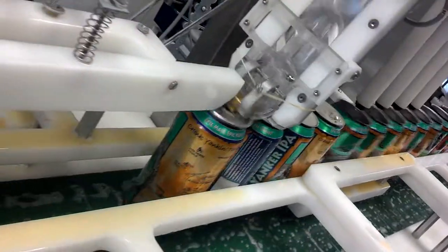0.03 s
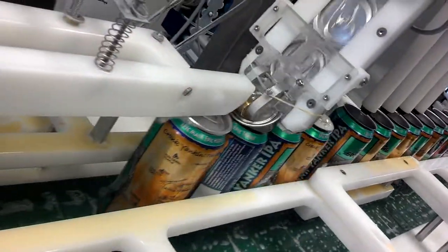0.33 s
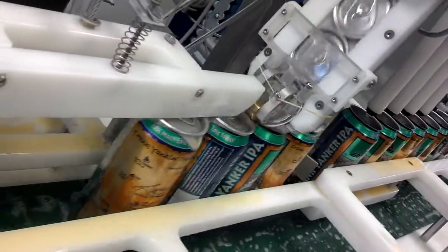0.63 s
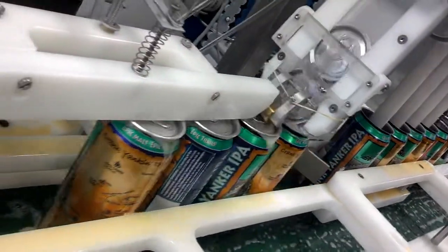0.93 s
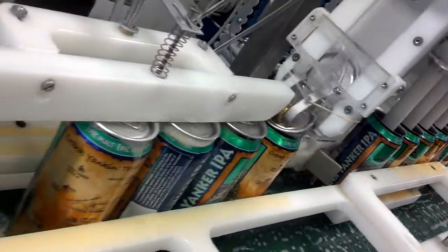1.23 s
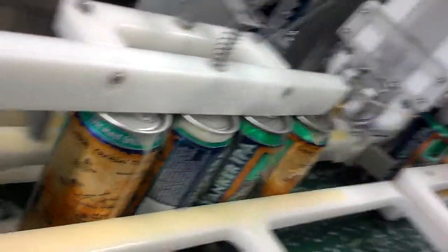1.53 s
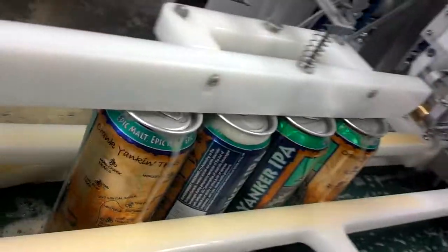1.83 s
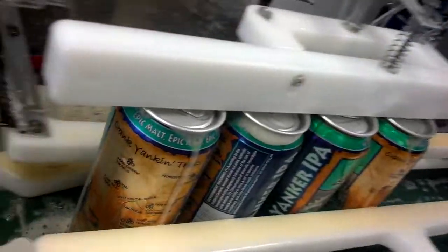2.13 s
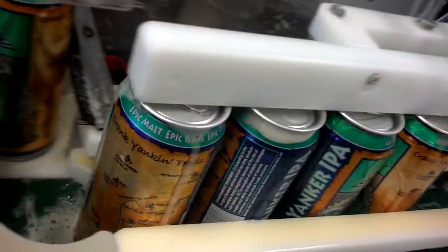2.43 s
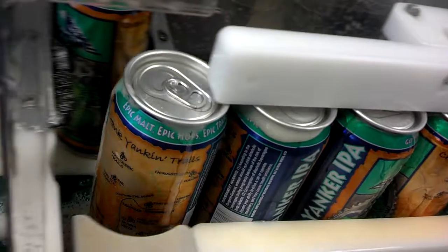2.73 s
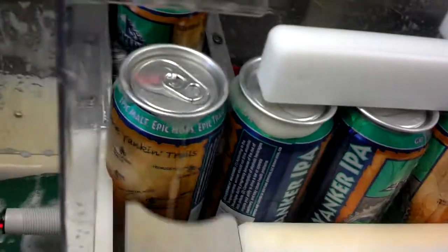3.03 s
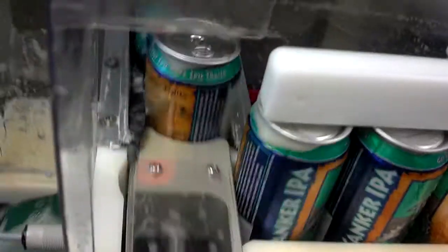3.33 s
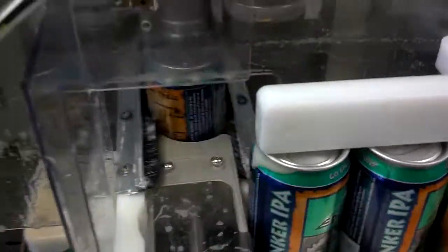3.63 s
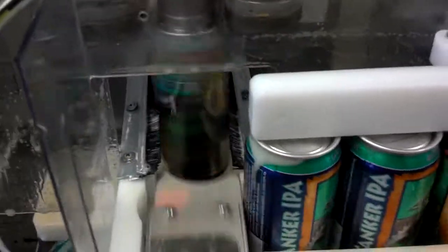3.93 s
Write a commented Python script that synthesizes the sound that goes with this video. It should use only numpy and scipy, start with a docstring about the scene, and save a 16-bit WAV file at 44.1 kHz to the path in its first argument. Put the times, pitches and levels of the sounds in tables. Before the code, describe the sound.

Metal cans knock together on a canning line as gas hisses over rumbling machinery.

```python
"""Aluminium cans jostle and clink on a canning line close by, their thin walls crackling at each touch.
Hard stops clack and plastic guides knock. A pusher scrapes to a halt and leaves a rail ringing.
A gas jet swells and shuts off, over the rumble of the machines.
Two microphone openings (ports), close together, are widened to stereo by delay and subtraction."""
import sys
import numpy as np
from scipy import signal
from scipy.fft import rfft, irfft, next_fast_len
from scipy.io import wavfile
from scipy.ndimage import map_coordinates

SR = 44100
rng = np.random.default_rng(int(sys.argv[2]) if len(sys.argv) > 2 else 0)


def store_pcm(level_fs):
    """Save levels as 16-bit WAV."""
    pcm = np.round(np.clip(level_fs, -1, 1) * 32767).astype(np.int16)
    wavfile.write(sys.argv[1], SR, np.atleast_2d(pcm).T)


N = 176400
T = np.arange(N) / SR
HIT_T = T[:SR // 4]  # time within one hit
CLINK_RISE_S = 0.0022
NEAR_ONLY = [[1], [0]]  # sounds have two rows: near port, far port

# Levels are relative. A "colour" is the level at each pitch; a "decay" is the time to fade by 60 dB.
# main colour of a can wall (frequency [Hz], level [dB])
CAN_WALL = [(300, -53), (1200, -17.5), (2300, -3.5), (3400, 1.5), (4400, -1.5), (5050, -6), (5550, 3.5),
            (6200, -9.5), (7500, -22)]
# its bright top (frequency [Hz], level [dB])
CAN_SIZZLE = [(4500, -25), (6500, -3.5), (9000, 2.5), (11000, 1), (13000, -5), (15500, -1.5)]


def cans(boost_db=5, ring_db=-5, detune=0.025):
    """Each touch gives a short crackle and a faint ring; no two cans are tuned quite alike."""
    # cans touching (time [s], level before the boost [dB], treble [dB], decay [s])
    clinks = [(.014, -27, -11, 0.03), (.039, -29, -17, 0.026), (0.057, -38, -14, 0.035),
              (.093, -17, -7, 0.031), (0.154, -20.5, -11, 0.069), (0.161, -29.5, 6.5, 0.041),
              (.197, -28, -5, 0.051), (0.257, -17.5, -26, 0.052), (.281, -31.5, 2.5, 0.071),
              (.33, -35.5, 2, 0.09), (0.35, -40, 14, 0.022), (0.399, -30, 1.5, 0.078),
              (0.412, -26, 4, 0.075), (0.452, -35.5, 11, 0.054), (.466, -35, 1, 0.063),
              (0.488, -43, 2, 0.043), (0.527, -21.5, -3.5, 0.035), (0.571, -26, -8, 0.044),
              (.577, -15, -5, 0.043), (.639, -29, -5.5, 0.09), (.714, -38, -9, .03),
              (0.724, -38, -4, 0.027), (0.776, -43, -3, 0.29), (0.873, -33, -11, 0.12),
              (0.924, -28.5, -16, 0.032), (.952, -25, -1, 0.03), (1.012, -33, -7, 0.061),
              (1.028, -23, -8, 0.096), (1.043, -27.5, -1.5, 0.11), (1.08, -37, -15, 0.071),
              (1.138, -37, 2, 0.038), (1.152, -36, 5, 0.029), (1.206, -40, 6, .04),
              (1.229, -31.5, -5, 0.074), (1.242, -28, -5, 0.053), (1.274, -42, 4, .08),
              (1.574, -25, -6.5, 0.036), (1.584, -21, -7, 0.029), (1.632, -27.5, 0, 0.089),
              (1.661, -20, -16, 0.033), (1.675, -18, -19, 0.058), (1.699, -27, -3.5, 0.051),
              (1.712, -21, -6, 0.033), (1.735, -29, 2, 0.028), (1.805, -21.5, -5, 0.063),
              (1.82, -32.5, 9.5, 0.089), (1.846, -24.5, 3, 0.029), (2.437, -26.5, -13, 0.078),
              (2.973, -19, -8, 0.06), (2.985, -23.5, 5.5, 0.018), (3.036, -30.5, -8, 0.053),
              (3.058, -27, -5, 0.13), (3.077, -22, -14, 0.04), (3.089, -22, -9, 0.056),
              (3.096, -29, -8, 0.12), (3.127, -41, 3, .03), (3.17, -37.5, -1, 0.1), (3.197, -37, 3, 0.069),
              (3.21, -34, -0.5, 0.13), (3.258, -33, 2, 0.052), (3.274, -29, 7, 0.034),
              (3.288, -30, 6, 0.065), (3.305, -35, 4.5, 0.1), (3.333, -31, 9, 0.03), (3.345, -45, 0, .03),
              (3.361, -40, 2, 0.082), (3.546, -24.5, -10, 0.029), (3.569, -35.5, -10, 0.047),
              (3.73, -42.5, -10, 0.05), (3.757, -53, 10.5, 0.044), (3.85, -23.5, -14.5, 0.068)]
    # notes a can rings at (frequency [Hz], level [dB], decay [s])
    can_notes = [(2420, -5, 0.034), (3505, -14, 0.062), (3866, -22, 0.034), (5500, -16, 0.12),
                 (9040, -17.5, 0.12), (11500, -13, 0.07)]
    out = np.zeros((2, N))
    for start, db, treble_db, decay in clinks:
        ring = 0
        for hz, note_db, note_decay in can_notes:
            note = tone(hz * (1 + detune * rng.normal()), HIT_T)
            ring += amp(note_db) * note * fade(note_decay, CLINK_RISE_S)
        wall = crackle(treble_db) * fade(decay, CLINK_RISE_S)
        add(out, start, amp(db + boost_db) * (wall + amp(ring_db) * ring))
    return out


def crackle(treble_db):
    """A thin can wall chatters at many pitches at once."""
    body = noise(CAN_WALL, len(HIT_T), uneven_db=7)
    sizzle = noise(CAN_SIZZLE, len(HIT_T), uneven_db=7)
    chatter = unit(amp(1.5 * wobble(517, HIT_T)))
    return (body + amp(treble_db) * sizzle) * chatter


def rims():
    """Can rims snap against each other with dry clicks."""
    # clicks (time [s], level [dB])
    snaps = [(.0935, -19), (0.167, -8), (.4108, -11.5), (0.454, -17), (0.5762, -12.5), (0.642, -25),
             (.953, -27), (1.138, -23), (1.152, -19.5), (1.8065, -16), (2.975, -14.5), (2.985, -8.5),
             (3.0583, -15), (3.077, -11.5), (3.2745, -10), (3.2879, -8.5), (3.3329, -15), (3.4734, -10),
             (3.547, -19), (3.851, -12.5)]
    # colour of a click (frequency [Hz], level [dB])
    colour = [(600, -18), (2000, -16), (3600, 10), (6000, 6.5), (10000, -15), (15500, 5.5)]
    out = np.zeros((2, N))
    for start, db in snaps:
        click = noise(colour, len(HIT_T), uneven_db=8) * fade(decay_s=0.011, rise_s=0.00015)
        add(out, start, amp(db) * click)
    return out


def jostle(touches_per_s=100, spread_db=4.5, treble_db=-6, decay_s=0.089):
    """Many cans touch faintly, at random, further along the queue."""
    # loudness of the queue (time [s], level [dB])
    loudness = [(0, -33.5), (.35, -36.5), (.7, -44), (1.05, -43), (1.75, -34), (2.2, -61), (2.9, -48),
                (3.3, -41), (3.65, -60), (4, -46)]
    touches = (rng.random(N) < touches_per_s / SR) * amp(spread_db * rng.standard_normal(N))
    fading_touches = unit(signal.fftconvolve(touches, fade(decay_s, CLINK_RISE_S))[:N])
    walls = noise(CAN_WALL) + amp(treble_db) * noise(CAN_SIZZLE)
    return amp(curves(loudness)[0]) * fading_touches * walls


def hard_stops():
    """A hard stop pings straight at the near port, and the sound scatters through the machine."""
    # clacks (time [s], level [dB], ping pitch [Hz], scatter compared with ping [dB])
    clacks = [(0.244, -12.5, 3350, -8.5), (1.5745, -3.5, 3330, -15), (2.06, 3, 3370, -14.5),
              (2.152, -5, 3260, -15), (3.4735, -4.5, 2790, -10.5), (3.524, -18, 3300, -7.5)]
    pings, scatter = np.zeros((2, 2, N))
    for start, db, hz, scatter_db in clacks:
        ping = np.sqrt(2) * np.sin(2 * np.pi * hz * HIT_T) * fade(decay_s=0.0049, rise_s=0.0003)
        add(pings, start, amp(db) * ping * NEAR_ONLY)
        clatter = crackle(treble_db=-5) * fade(decay_s=0.047, rise_s=0.00033)
        add(scatter, start, amp(db + scatter_db) * clatter)
    return pings, scatter


def guides():
    """A knock on a plastic guide gives a dull thud and rattles the frame."""
    # knocks (time [s], level [dB], pitch [Hz], rattle [dB], decay [s])
    knocks = [(.076, -24.5, 415, 6, 0.069), (.088, -21, 964, 4, 0.045), (.107, -22, 1537, 10, 0.037),
              (0.159, -14.5, 1290, -21, 0.03), (0.257, -23.5, 1210, -3, 0.05), (.575, -28, 346, 2, 0.08),
              (1.027, -24, 342.6, 0, 0.17), (1.186, -30, 276, -19, 0.081), (1.229, -33, 169, -5, 0.21),
              (1.268, -17.5, 440, 3.5, 0.028), (1.274, -17.5, 396, -7, 0.076),
              (1.2765, -18, 1440, 13, 0.016), (1.307, -21.5, 388, -10, 0.085), (1.346, -30, 391, 0, 0.16),
              (1.572, -18, 1098, -3.5, 0.06), (1.662, -35.5, 790, 14.5, 0.084),
              (1.678, -16.5, 374, -2, 0.069), (2.021, -25, 910, -15, 0.075), (2.06, -18, 1677, -1.5, 0.04),
              (2.363, -33.5, 273, -4.5, 0.33), (2.439, -35.5, 1290, 5, 0.17),
              (2.973, -21.5, 1088, -1, 0.071), (3.06, -26.5, 1990, -2, 0.11),
              (3.08, -38, 1200, 13.5, 0.083), (3.851, -38.5, 431, 12.5, 0.14)]
    # notes within a thud (multiple of the pitch, level [dB])
    thud_notes = [(.8, -9.5), (1, 1.5), (1.45, -4.5)]
    out = np.zeros((2, N))
    for start, db, hz, rattle_db, decay in knocks:
        blur_radians = 1.53 * min(1, amp(rattle_db))  # more rattle, less clear pitch
        thud = 0
        for ratio, note_db in thud_notes:
            phase = 2 * np.pi * ratio * hz * HIT_T + blur_radians * wobble(142, HIT_T)
            thud += amp(note_db) * np.sin(phase)
        knock = thud * NEAR_ONLY + amp(rattle_db) * frame_rattle()
        add(out, start, amp(db) * knock * fade(decay, rise_s=0.0017))
    return out


def frame_rattle():
    """The shaken frame makes noise with no clear pitch."""
    # colour of the frame (frequency [Hz], level [dB])
    colour = [(70, -48), (130, -25), (300, -8.5), (700, -0.5), (1300, 1), (2000, 3), (3200, -0.5),
              (6000, -82)]
    return noise(colour, len(HIT_T), uneven_db=1.5)


def pusher(ring_start_s=0.1, ring_decay_s=1.33):
    """A juddering scrape ends by setting a steel rail ringing."""
    # loudness of the scrape (time [s], level [dB])
    loudness = [(0, -26.5), (.02, -26.5), (.05, -26.5), (.07, -22.5), (.09, -21), (.11, -35), (.16, -30.5),
                (.19, -64), (.3, -55), (.5, -92)]
    # colour of the scrape (frequency [Hz], level [dB])
    colour = [(100, -15), (300, -14), (420, -7), (520, 4.5), (700, -1), (860, -5), (960, 11.5), (1100, -2),
              (1400, -8), (1850, -9.5), (2500, -8), (5000, -23)]
    # notes of the rail (frequency [Hz], level [dB])
    rail_notes = [(565, -36.5), (640, -49), (745, -40), (950, -42), (1152, -34), (1680, -40.5), (1823, -39),
                  (2120, -44), (3692, -63)]
    out = amp(curves(loudness)[0] + 2.2 * wobble(69)) * noise(colour)
    for hz, db in rail_notes:
        ring = amp(db + 4 * wobble(27)) * wavering_tone(hz, radians=0.76, rate=35)
        add(out, ring_start_s, ring * fade(ring_decay_s, rise_s=0.006, t=T))
    return out


def gas_jet():
    """Gas hisses out, sags and shuts off; it turns hollow as the listener moves along the guides."""
    # loudness of the hiss (time [s], level [dB])
    loudness = [(0, -64), (1.18, -54), (1.24, -45), (1.29, -29.5), (1.45, -25.5), (1.56, -25),
                (1.62, -30.5), (1.8, -28.5), (1.92, -32), (2.2, -35.5), (2.4, -33.5), (2.78, -30.5),
                (2.82, -32.5), (2.88, -44.5), (3.05, -48), (4, -72)]
    # colour facing the nozzle (frequency [Hz], level [dB])
    front_colour = [(500, -18), (1500, -12), (2200, 6.5), (2900, -4), (3600, 4), (4400, -7), (5000, 4),
                    (5500, 0), (6300, 2.5), (7600, -0.5), (8700, 1.5), (10000, 0.5), (10900, -1),
                    (12300, 2), (14500, 5.5), (15800, 0)]
    # colour further along the guides (frequency [Hz], level [dB])
    aside_colour = [(500, -8.5), (1600, -28), (2040, 14.5), (2300, -11), (3200, -1), (3500, -5),
                    (3800, 4.5), (4100, -5), (4450, 4.5), (4950, 5), (5250, 0.5), (5600, 1), (6500, 3.5),
                    (7200, 5.5), (7700, 0.5), (9300, 0.5), (10900, -7), (12500, 3), (14000, 4), (15500, 3)]
    # blend between them (time [s], share of the second colour [0-1])
    blend = [(1.8, 0), (2.45, 0.95)]
    share, = curves(blend)
    front = np.sqrt(1 - share) * noise(front_colour, uneven_db=3.5)
    aside = np.sqrt(share) * noise(aside_colour, uneven_db=4)
    return amp(curves(loudness)[0] + 0.3 * wobble(29.7)) * (front + aside)


def valve(start_s=1.275, db=-41, start_hz=6340, end_hz=5200, sag_s=0.2):
    """A breathy squeal sinks in pitch as the jet starts."""
    out = np.zeros((2, N))
    hz = end_hz + (start_hz - end_hz) * np.exp(-T / sag_s) + 170 * wobble(830)
    squeal = np.sin(2 * np.pi * np.cumsum(hz) / SR) * fade(decay_s=0.3, rise_s=0.0087, t=T)
    add(out, start_s, amp(db) * squeal * NEAR_ONLY)
    return out


def machinery():
    """The conveyor rumbles and whirrs while its motors hum."""
    # loudness of the machines (time [s], rumble [dB], whirr [dB])
    loudness = [(0, -40, -36), (.3, -46, -33), (.5, -46.5, -43.5), (.72, -50.5, -44.5), (.95, -47.5, -39.5),
                (1.1, -38, -36.5), (1.25, -42.5, -36), (1.42, -39.5, -37), (1.62, -41, -37.5),
                (1.73, -39, -35), (1.86, -51.5, -40), (2, -43, -35.5), (2.25, -42.5, -41.5),
                (2.4, -42.5, -37.5), (2.7, -43.5, -42), (3, -43, -36.5), (3.25, -49, -45),
                (3.45, -47.5, -45), (3.72, -48, -44), (3.87, -37.5, -41), (4, -42.5, -40.5)]
    # colour of the low rumble (frequency [Hz], level [dB])
    rumble_colour = [(25, -10), (50, -12), (95, -19), (120, -3.5), (170, -1.5), (260, 2), (400, 4),
                     (600, 0), (1000, -18), (2000, -47)]
    # colour of the rattling whirr (frequency [Hz], level [dB])
    whirr_colour = [(250, -47), (550, 2), (800, 3), (1100, 1.5), (1500, -2), (2200, -5), (3600, -12.5),
                    (4900, -11.5), (5550, -11.5), (6400, -23), (10000, -27.5), (16000, -16)]
    # motor notes (frequency [Hz], level [dB])
    motor_notes = [(120, -62), (270, -58.5), (392, -57), (736, -59.5), (949, -70)]
    rumble_db, whirr_db = curves(loudness)
    rumble = amp(rumble_db + 1.9 * wobble(25.15)) * noise(rumble_colour)
    whirr = amp(whirr_db + 1.5 * wobble(50)) * noise(whirr_colour)
    hum = sum(amp(db + 2.5 * wobble(10)) * wavering_tone(hz, radians=0.74, rate=16)
              for hz, db in motor_notes)
    return rumble + whirr + hum


def drive_whistles():
    """The motor drives give thin, slightly unsteady whistles."""
    # loudness of both whistles (time [s], level [dB])
    loudness = [(3.3, -63), (3.65, -55), (4, -52)]
    # whistle notes (frequency [Hz], added level [dB])
    notes = [(4856, 4), (10092, -5)]
    level, = curves(loudness)
    return sum(amp(level + db + 2.5 * wobble(13)) * wavering_tone(hz, radians=0.41, rate=50)
               for hz, db in notes)


def room(sound, decay_s=0.17, db=-11):
    """The machine housing and the hall answer with a short, blurred echo."""
    tail = rng.standard_normal((2, SR // 2)) * fade(decay_s, rise_s=0.012, t=T[:SR // 2])
    tail /= np.linalg.norm(tail[0])
    return amp(db) * signal.fftconvolve(sound[:1], tail, axes=1)[:, :N]


def amp(db):
    """Turn decibels into a multiplier."""
    return 10 ** (np.asarray(db) / 20)


def unit(x):
    """Scale to an average strength (rms) of 1."""
    return x / np.sqrt(np.mean(x ** 2) + 1e-20)


def along(points, hz):
    """Read between (frequency, value) points, with octaves evenly spaced."""
    frequencies, values = np.transpose(points)
    return np.interp(np.log(hz + 1), np.log(frequencies + 1), values)


def curves(rows):
    """One value per sample for each column after the time."""
    times, *columns = np.transpose(rows)
    return [np.interp(T, times, column) for column in columns]


def wobble(rate, axis=T):
    """A smooth curve through `rate` random points per unit of the axis (seconds by default)."""
    points = rng.standard_normal(int(axis[-1] * rate) + 4)
    return map_coordinates(points, [axis * rate], mode="nearest")


def noise(colour, size=N, uneven_db=0):
    """Noise at both ports, with random peaks and dips in its colour."""
    hz = np.fft.rfftfreq(size, 1 / SR)
    gain = amp(along(colour, hz) + uneven_db * wobble(1 / 300, hz))
    white = rng.standard_normal((2, size))
    return unit(irfft(rfft(white) * gain, size))


def tone(hz, t):
    """A pure note that reaches each port at a random point in its cycle."""
    return np.sqrt(2) * np.sin(2 * np.pi * (hz * t + rng.random((2, 1))))


def wavering_tone(hz, radians, rate):
    """A note whose wave drifts ahead and behind at random."""
    return tone(hz, T + radians * wobble(rate) / (2 * np.pi * hz))


def fade(decay_s, rise_s, t=HIT_T):
    """Rise quickly, then die away."""
    return np.exp(-np.log(1000) * t / decay_s) * (1 - np.exp(-t / rise_s))


def add(out, start_s, sound):
    """Mix a sound into out at its start time."""
    part = out[:, max(0, round(start_s * SR)):][:, :sound.shape[1]]
    part += sound[:, :part.shape[1]]


def widen_dips(comb, width=0.28):
    """Broaden the gaps of a comb, a filter with evenly spaced silent pitches."""
    return comb * np.abs(comb) ** 3 / np.sqrt(comb ** 6 + width ** 6)


def scene(far_port_db=-7.5):
    """Everything as it reaches the near and the far port."""
    pings, scatter = hard_stops()
    hits = cans() + rims() + scatter + guides()
    background = jostle() + pusher() + gas_jet() + valve() + machinery() + drive_whistles()
    return (pings + hits + room(hits) + background) * amp([[0], [far_port_db]])


def record(dry, low_cut_hz=120, top_hz=15850, port_delay_s=16 / SR, gain_db=-2):
    """Make stereo from the ports' sum (mid) and difference (side); trim deep bass and top treble."""
    # strength of the side signal (frequency [Hz], gain [dB])
    side_gain = [(60, -1), (300, -2.5), (700, -5.5), (1200, 1), (2200, 0), (5500, 0), (16000, 0.5)]
    # shift of the mid wave against the side in the bass (frequency [Hz], phase [radians])
    bass_shift = [(60, 2), (200, 0.85), (450, 1.55), (900, 1.38), (1400, 1.7)]
    size = next_fast_len(N + SR // 4)
    hz = np.fft.rfftfreq(size, 1 / SR)
    low = 1j * hz / low_cut_hz
    low_cut = low ** 2 / (low ** 2 + low + 1)
    near, far = rfft(dry, size) * low_cut
    turn = np.pi * hz * port_delay_s
    # mid dips where side peaks, except in the bass, which mid keeps whole
    bass = np.exp(1j * along(bass_shift, hz))
    mid = (near + far) * np.where(turn < np.pi / 2, bass, 1j * widen_dips(np.sin(turn)))
    side = (near - far) * widen_dips(np.cos(turn)) * amp(along(side_gain, hz))
    stereo = np.array([mid + side, mid - side])
    return irfft(amp(gain_db) * stereo * (hz < top_hz), size)[:, :N]


dry = scene()
out = record(dry)
store_pcm(out)
```